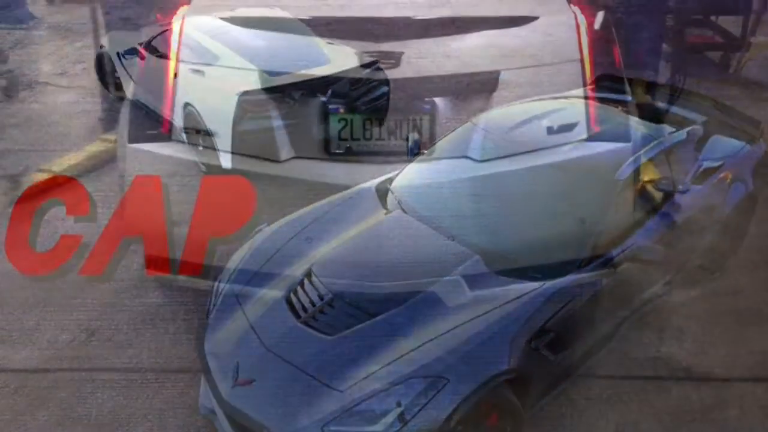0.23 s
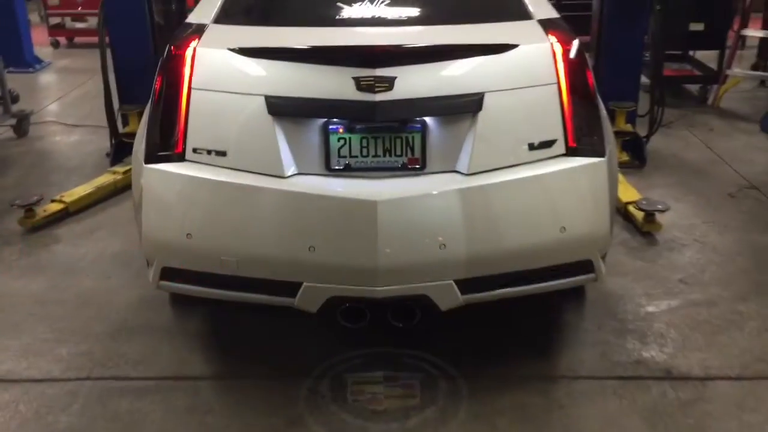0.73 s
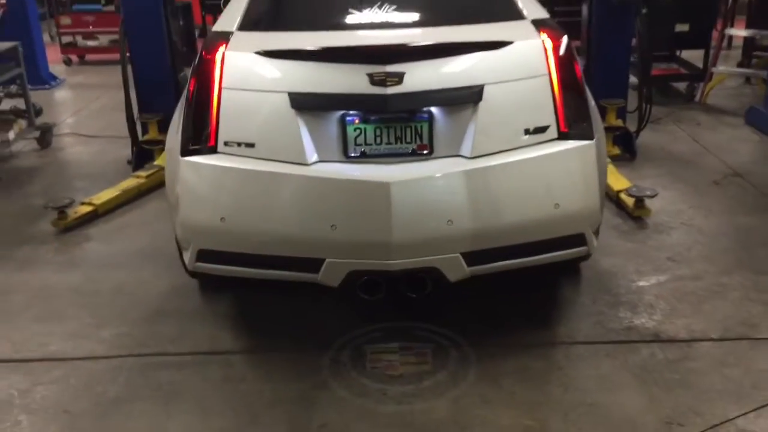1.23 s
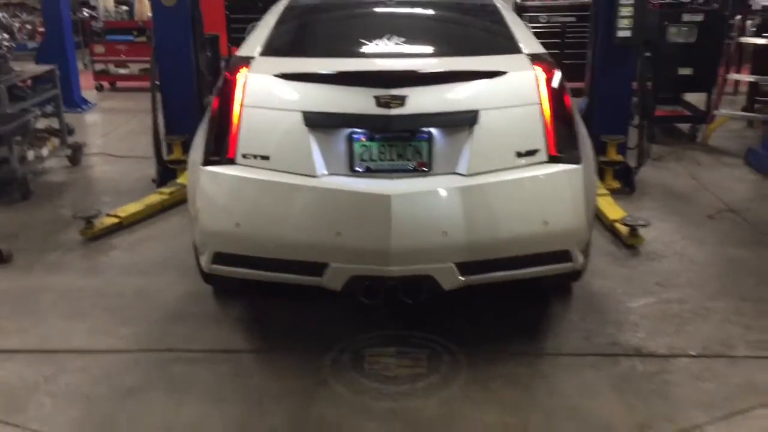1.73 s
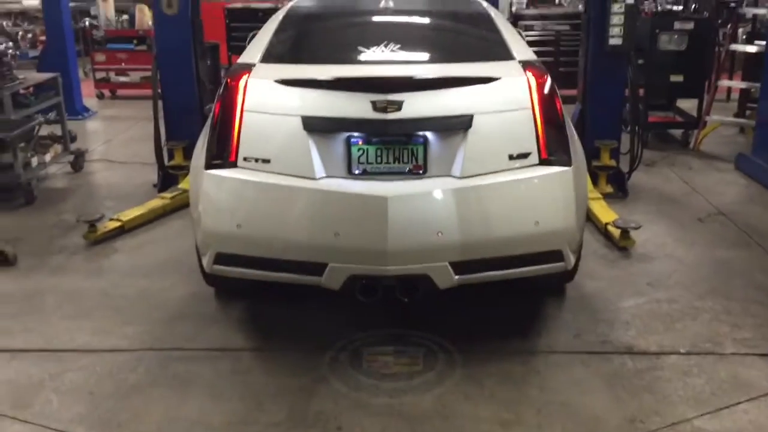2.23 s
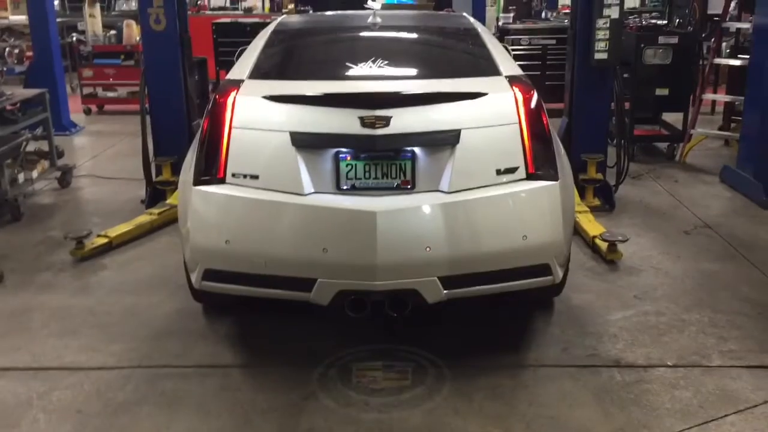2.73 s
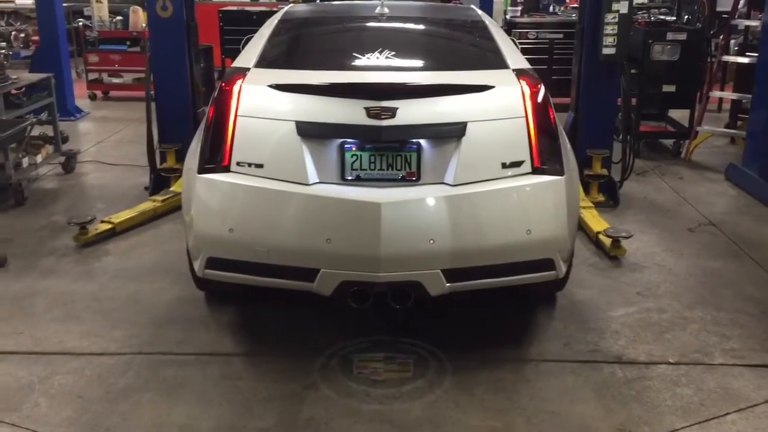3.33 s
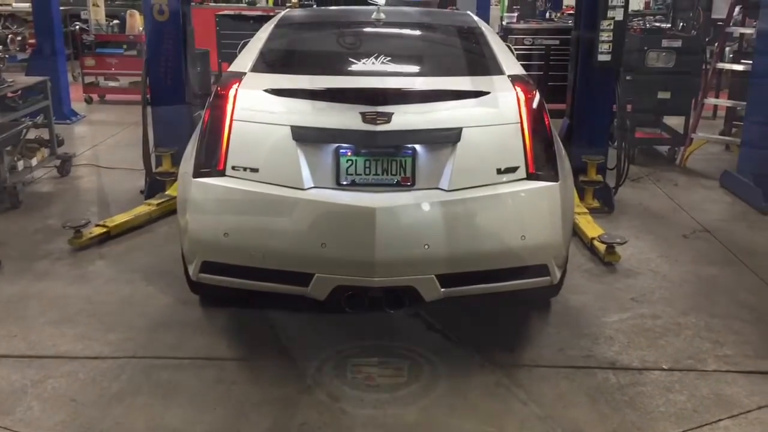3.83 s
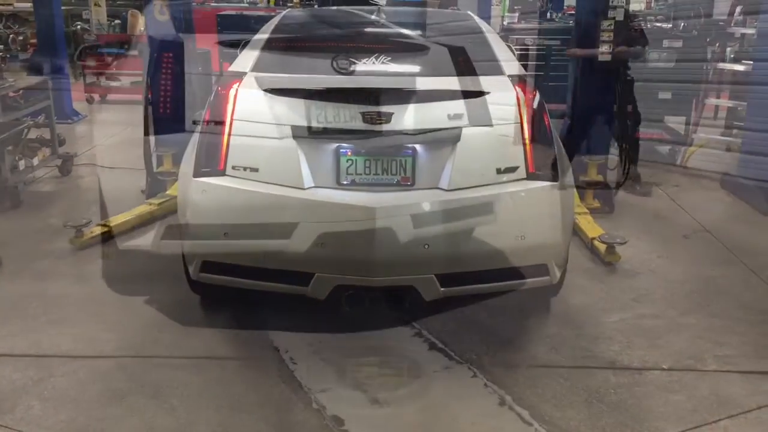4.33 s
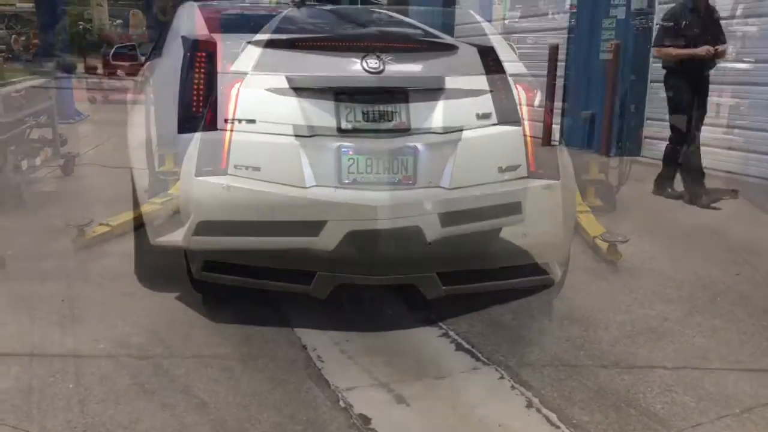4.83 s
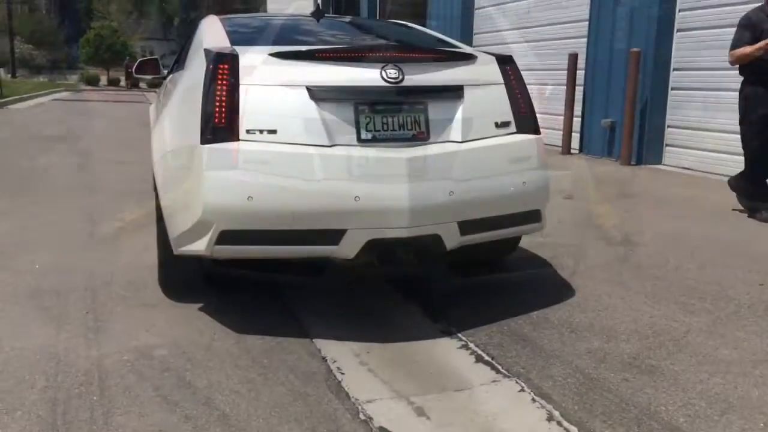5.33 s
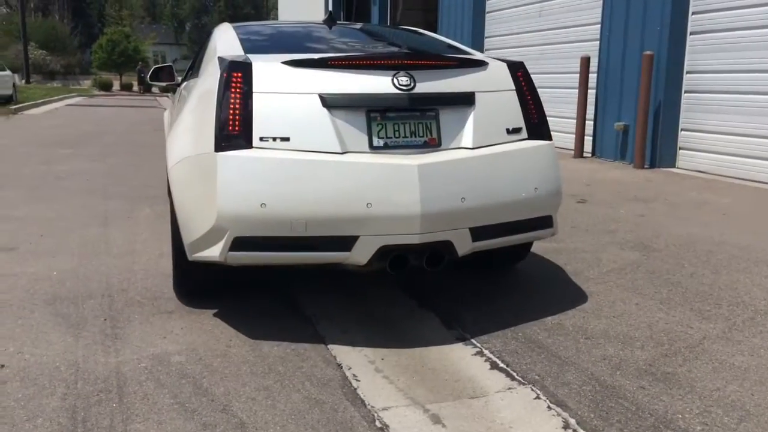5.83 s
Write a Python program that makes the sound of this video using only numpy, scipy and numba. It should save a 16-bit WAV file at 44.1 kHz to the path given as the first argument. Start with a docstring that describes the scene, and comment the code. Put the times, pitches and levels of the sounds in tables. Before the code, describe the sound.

A muscle car's idle throbs and stumbles: low pipe booms, hard slaps and hissy puffs in irregular groups, reverberating indoors. Then the sound dissolves into drier outdoor air, the engine pulls upward under load with a shaky low shudder and brief thin whine, the bass drops away, and spinning tyres roar and screech to the end. Close microphone, same in both channels.

```python
"""Big-cam eight: workshop idle and yard launch

A big-cam eight idles in a workshop, heard close behind the tailpipes. Uneven firings ring the resonant
pipes, and puffs of turbulent gas spit from the tips in groups, a few to the second, and reverberate.
The scene dissolves to a yard: the firing rate climbs under load, the pipes sing and gate the gas, a blower
whines, and the tyres break loose with a roar of broadband noise and a stick-slip squeal."""
import sys
import numpy as np
from scipy import signal
from scipy.fft import rfft, irfft
from scipy.io import wavfile
from scipy.ndimage import uniform_filter1d
from numba import njit

SR = 44100
rng = np.random.default_rng(int(sys.argv[2]) if len(sys.argv) > 2 else 0)


def generate_wav(signal):
    """Clip the signal to [-1, 1] and save it as 16-bit WAV at the path in sys.argv[1]."""
    frames = np.transpose(np.atleast_2d(signal))
    scaled = np.clip(frames, -1, 1) * 32767
    pcm = np.round(scaled).astype(np.int16)
    wavfile.write(sys.argv[1], SR, pcm)


N = 268524
T = np.arange(N) / SR  # time/s

IDLE_HZ = 46.78  # mean firing rate; it wanders
# surges of the idle: start t/s, length/s, then relative levels at the end of the surge:
# gas level/dB, gas swell over the surge/dB, middle pipe level/dB, silencer ring level/dB
IDLE_SURGES = [(0.01, 0.18, -22.5, 4, -42, -25.5), (0.28, 0.18, -19, 9.5, -22.5, -22.5),
               (0.582, 0.02, -35, 0, -38, -28), (0.638, 0.17, -16.5, 4.5, -19, -19),
               (0.917, 0.019, -25, 7, -14.5, -19.5), (0.961, .17, -18.5, 2, -21.5, -17),
               (1.247, 0.14, -16, 6, -17, -18), (1.445, 0.068, -18.5, -1, -27, -18.5),
               (1.579, .18, -16.5, 2, -20.5, -20.5), (1.838, 0.21, -15, 5.5, -17.5, -20),
               (2.168, 0.18, -14, 5.5, -17.5, -18.5), (2.541, 0.17, -15.5, 4.5, -19.5, -18),
               (2.805, .04, -29, -2, -37, -24), (2.879, 0.16, -14.5, 6.5, -21.5, -16),
               (3.184, 0.16, -12.5, 8, -17, -16.5), (3.558, 0.12, -13.5, 5.5, -18, -14.5),
               (3.86, 0.15, -14, 9, -22.5, -21.5), (4.155, 0.14, -15, 8.5, -30, -22.5),
               (4.456, .17, -19, 1.5, -21.5, -28), (4.764, 0.233, -18, 4.5, -30, -26),
               (5.035, .06, -13.5, -3, -20, -19)]


def idle():
    """Source and resonator: a pulse train excites pipe modes, and gas jets echo round the workshop."""
    gas_db, gas_swell_db, middle_db, ring_db = np.transpose(IDLE_SURGES)[2:]
    fire = firings(IDLE_HZ * (1 + 0.06 * walk(3)), jitter=0.1013, scatter_db=4)
    drive = unit(fire) + 0.71 * rng.standard_normal(N)  # turbulence fills in between firings
    pipes = long_pipe(drive) + middle_pipe(drive, middle_db) + silencer(drive, ring_db)
    gas = tailpipe_gas(fire, gas_db, gas_swell_db)
    return ground(pipes + gas + workshop_echo(gas))


def firings(hz, jitter, scatter_db):
    """Pulse train: one impulse per firing, uneven in time (jitter in periods) and size."""
    count = 2000
    chance = rng.standard_normal((count, 2))
    turns = np.cumsum(hz * np.ones(N)) / SR
    at = np.interp(np.arange(count) + jitter * chance[:, 0], turns, np.arange(N))
    inside = at < N - 1
    pulses = np.zeros(N)
    np.add.at(pulses, at[inside].astype(int), undb(scatter_db * chance[inside, 1]))
    return pulses


def surging(level_db, swell_db, attack_s, fall_db_per_s, rest_db):
    """Energy addition: surges attack, swell and decay over a resting level; returns dB."""
    power = undb(2 * rest_db) * np.minimum(0.75 + T / 0.36, 1) ** 2
    swells = np.broadcast_to(swell_db, len(level_db))
    for (start, length), db, swell in zip(np.array(IDLE_SURGES)[:, :2], level_db, swells):
        late = T - start - length
        slope_db = np.where(late < 0, swell * late / length, -fall_db_per_s * late)
        attack = np.clip((T - start) / attack_s, 0, 1)
        power += (attack * undb(db + slope_db)) ** 2
    return 10 * np.log10(power)


# booms of the long pipe: peak t/s, pitch f/Hz, relative level/dB
LONG_PIPE_BOOMS = [(0.14, 80, -33), (0.3, 87, -16.5), (0.41, 88.5, -18), (0.52, 72.5, -13),
                   (0.68, 70, -12.5), (0.79, 73, -13.5), (0.88, 75, -12), (1.0, 75, -13.5), (1.1, 74, -14),
                   (1.27, 77, -9.5), (1.46, 83, -16.5), (1.58, 87, -15), (1.67, 87, -15),
                   (1.84, 86.6, -13.5), (1.96, 85, -13.5), (2.1, 74, -11.5), (2.2, 75.4, -11),
                   (2.32, 67, -16), (2.47, 76, -12.5), (2.57, 80, -8.5), (2.66, 94, -19), (2.82, 83, -12.5),
                   (2.92, 82.4, -12.5), (3.05, 93, -18), (3.219, 82, -7), (3.38, 66, -13.5),
                   (3.52, 78, -16), (3.6, 83, -14), (3.74, 67, -14.5), (3.9, 75, -12), (4.0, 74, -20),
                   (4.14, 81, -31), (4.22, 79, -14), (4.35, 81.6, -12), (4.48, 83, -15), (4.63, 100, -14),
                   (4.76, 101, -16)]
BOOM_RISE_S, BOOM_FALL_S, BOOM_REST_DB = 0.027, 0.043, -24


def booming():
    """Amplitude modulation: bell-shaped swells over a low drone; returns pitch in Hz and gain."""
    power = undb(2 * BOOM_REST_DB)
    for s, _, db in LONG_PIPE_BOOMS:
        span_s = np.where(T < s, BOOM_RISE_S, BOOM_FALL_S)
        power = power + undb(2 * db) * np.exp(-((T - s) / span_s) ** 2)
    throb = undb(1 * walk(30))  # uneven firings beat in the pipe
    return curves(LONG_PIPE_BOOMS)[0], np.sqrt(power) * throb


# longest pipe: f/Hz, bandwidth/Hz, relative level/dB
LONG_PIPE_THUD = [(54.2, 11, 0)]


def long_pipe(drive):
    """Pipe resonance: a mode of moving pitch booms over a fixed low thud."""
    boom_hz, boom_gain = booming()
    boom = boom_gain * even(band(drive, boom_hz, 20.6), 0.035)
    thud_gain = undb(-25) * np.minimum(0.53 + T / 0.9, 1)
    thud = thud_gain * unit(resonate(drive, LONG_PIPE_THUD))
    return (boom + thud) * np.clip((4.85 - T) / 0.29, 0, 1)


# middle pipe: f/Hz, bandwidth/Hz, relative level/dB (level unused)
MIDDLE_PIPE = [(130.55, 11.4, 0)]
# brief drops of the middle pipe: t/s, depth/dB
MIDDLE_PIPE_DROPS = [(0.58, 14), (0.94, 14), (1.09, 18), (1.58, 16), (1.97, 20), (2.17, 7), (2.34, 12),
                     (2.85, 16), (3.22, 13), (3.85, 18)]
DROP_WIDTH_S = 0.025


def middle_pipe(drive, level_db):
    """Pipe resonance: one narrow mode follows the surges slowly and drops out briefly."""
    db = surging(level_db, swell_db=4.5, attack_s=0.073, fall_db_per_s=29.5, rest_db=-30.5)
    db += 2 * walk(22)  # uneven firings beat in the pipe
    for s, depth_db in MIDDLE_PIPE_DROPS:
        db -= depth_db * np.exp(-((T - s) / DROP_WIDTH_S) ** 2)
    hz, width, _ = MIDDLE_PIPE[0]
    return undb(db) * even(band(drive, hz, width), 0.035)


# silencer modes: f/Hz, bandwidth/Hz, relative level/dB
SILENCER_MODES = [(185.5, 4.44, 2), (242.9, 6.24, 2.5), (285.8, 13.1, -4), (341.8, 4.6, -11.5),
                  (361, 6.7, -19), (456, 35, -47.5), (557, 21, -24.5)]


def silencer(drive, level_db):
    """Modal ringing: the drive excites the silencer's resonances, louder in each surge."""
    db = surging(level_db, swell_db=5.5, attack_s=0.03, fall_db_per_s=92, rest_db=-30)
    db += 1.5 * walk(25)  # uneven firings beat in the pipes
    return undb(db) * even(resonate(drive, SILENCER_MODES), 0.063)


# the hardest firings: t/s, relative peak level/dB, throat share level/dB, top end share level/dB
HARD_FIRINGS = [(0.014, -17, -13, -3.5), (0.144, -13, -10, -16), (0.292, -12.5, -24, -8),
                (0.338, -12.5, -23, -4.5), (0.362, -6.5, -13, -16), (0.426, -11.5, -7.5, -11),
                (0.489, -6.5, -10.5, -12), (0.578, -6.5, -15, -14.5), (0.647, -6, -21, -16),
                (0.691, -2, -14, -12.5), (0.717, -4.5, -8.5, -11), (0.776, -8, -3.5, -25),
                (0.837, -8, -20, -12.5), (0.928, -5.5, -14, -14), (0.973, -10.5, -12, -8.5),
                (0.995, -7.5, -10.5, -10), (1.04, -2.5, -6, -14.5), (1.068, -2, -17, -14.5),
                (1.121, -12, -1, -7), (1.254, -10, -10.5, -14), (1.279, -8, -9, -13),
                (1.323, -5, -11.5, -11.5), (1.347, -5.5, -30, -16), (1.384, -6, -14, -11.5),
                (1.47, -7, -9, -27), (1.538, -6, -19, -14.5), (1.58, -11, -17, -12), (1.606, -8, -7, -11),
                (1.65, -6, -9.5, -15), (1.734, -8, -5, -8), (1.842, -13, -16, -8), (1.871, -15, -22, -5),
                (1.89, -18, -22, -14), (1.937, -1.5, -23, -10.5), (1.996, -6, -9.5, -20),
                (2.061, -6.5, -20, -16), (2.173, -29, -18, -14), (2.224, -8, -20, -10),
                (2.264, -10.5, -12, -6.5), (2.304, -11, 0, -17), (2.546, -13, -18, -10),
                (2.575, -3.5, -27, -11), (2.615, -7.5, -11.5, -7), (2.636, -2.5, -9.5, -16),
                (2.698, -9.5, -4, -15), (2.811, -17, -16, -9), (2.876, -21, -3, -30), (2.902, -8, -19, -16),
                (2.927, -6, -17, -13.5), (2.968, -3, -8, -13.5), (3.184, -15, -12, -18),
                (3.209, -12, -9.5, -14), (3.257, -1.5, -16, -13), (3.299, -8.5, -15, -27),
                (3.358, -7.5, -3.5, -8), (3.562, -13.5, -7, -11), (3.607, -7, -19, -25),
                (3.646, -3.5, -9.5, -22), (3.706, -5, -9.5, -9), (3.86, -11.5, -18, -10),
                (3.905, -11.5, -13, -14), (3.928, -11.5, -4.5, -15), (3.971, -6, -9, -20),
                (4.161, -8.5, -18, -9.5), (4.206, -4, -8.5, -15), (4.489, -11.5, -15, -14),
                (4.557, -11, -7, -10)]
# tailpipe and floor colour of the gas: f/Hz, bandwidth/Hz, relative level/dB
TAILPIPE_MODES = [(793, 120, -4.5), (883, 134, 5.5), (966, 45, 5), (1079, 68, 3.5), (1177, 107, -1.5),
                  (1523, 62, -1), (1690, 89, -6.5), (1850, 76, 0), (2202, 83, -6), (2330, 53, -4.5),
                  (2584, 243, -5), (2734, 215, -7), (3502, 235, -4), (3710, 180, -1), (4226, 570, -6.5)]
# jet noise: f/Hz, bandwidth/Hz, relative level/dB
JET_MODES = [(5580, 4400, -0.5), (8900, 1300, 0), (12400, 2200, -6)]
THROAT_TOP_HZ = 1300  # the throat part drives modes below this


def tailpipe_gas(fire, level_db, swell_db):
    """Modulated turbulence: firings gate jet noise, and the tips' modes colour it."""
    gas_db = surging(level_db, swell_db, attack_s=0.0058, fall_db_per_s=285, rest_db=-32.5)
    flow = unit(0.8 + puff(np.sqrt(fire), 0.001, 0.010))
    steady = undb(gas_db - 4) * flow
    throat, middle, top = np.zeros((3, N))
    for s, peak_db, throat_db, top_db in HARD_FIRINGS:
        at = int(s * SR)
        throat[at] = undb(peak_db + throat_db)
        middle[at] = undb(peak_db)
        top[at] = undb(peak_db + top_db)
    noise = rng.standard_normal(N)
    # each hard firing is a slap, then rushing gas
    deep = noise * np.hypot(steady, 1.13 * puff(throat, 0.00048, 0.015)) + 25 * throat
    bright = noise * np.hypot(steady, 0.32 * puff(middle, 0.0007, 0.018)) + 4 * middle
    body = 0
    for k, mode in enumerate(TAILPIPE_MODES):
        source = deep if mode[0] < THROAT_TOP_HZ else bright
        upper_mid = THROAT_TOP_HZ < mode[0] < 2 * THROAT_TOP_HZ
        colour = undb(1.5 - 0.5 * T) if upper_mid else 1  # the upper middle thins out with time
        flicker = undb(2.97 * walk(70))  # the balance of modes keeps changing
        body = body + (-1) ** k * colour * resonate(source * flicker, [mode])
    body = 0.79 * body / np.std(resonate(noise, TAILPIPE_MODES))
    spit = 0
    for mode in JET_MODES:
        spit = spit + resonate(rng.standard_normal(N) * undb(3.45 * walk(60)), [mode])
    spit_gain = np.hypot(undb(1.09 * gas_db - 7) * flow, 1.16 * puff(top, 0.0017, 0.011))
    return body + unit(spit) * spit_gain


def puff(pulses, rise_s, fall_s):
    """Impulse response: each impulse becomes a quick rise and an exponential fall."""
    t = np.arange(int(6 * fall_s * SR)) / SR
    return signal.fftconvolve(pulses, (1 - np.exp(-t / rise_s)) * np.exp(-t / fall_s))[:N]


def workshop_echo(gas):
    """Reverberation: convolution with noise that decays by 60 dB in the reverberation time."""
    t60_s, level_db = 0.48, -9.5
    t = np.arange(int(t60_s * SR)) / SR
    tail = rng.standard_normal(len(t)) * 1000 ** (-t / t60_s) * np.minimum(t / 0.0025, 1)
    tail = signal.lfilter([1], [1, -0.4], tail)  # walls soak up the treble
    tail = tail / np.sqrt(np.sum(tail ** 2))
    return undb(level_db) * signal.fftconvolve(gas, tail)[:N]


BREAK_S = 5.43  # the tyres break loose
# pull in the yard: t/s, firing rate f/Hz, exhaust note level/dB, rasp level/dB, roar level/dB
YARD_PULL = [(3.9, 74.9, -31, -48.5, -35), (4.2, 85.4, -26.5, -27.5, -30), (4.6, 102.7, -18, -21, -41),
             (4.78, 102.3, -16.5, -23, -32), (4.9, 96, -10, -40, -27), (5.04, 88.2, -13.5, -22.5, -36.5),
             (5.1, 92.2, -10.5, -22, -31), (5.15, 108.1, -10, -18, -22.5), (5.21, 123.2, -10.5, -21.5, -17),
             (5.32, 143.5, -11, -21.5, -19.5), (5.39, 155.2, -10.5, -18, -17.5),
             (5.44, 161.1, -13, -18, -12), (5.49, 166, -9.5, -18, -9.5), (5.7, 187.3, -10, -17, -7.5),
             (5.85, 197, -20, -22, -9), (6.09, 200, -36, -28, -7.5)]


def launch():
    """Superposition: exhaust, tyres, blower and a low rumble add in the open yard."""
    fire_hz, note_db, rasp_db, roar_db = curves(YARD_PULL)
    exhaust = open_exhaust(fire_hz, note_db, rasp_db)
    return ground(exhaust) + tyre_roar(roar_db) + tyre_squeal() + blower_whine() + yard_rumble()


# pipes in the open: f/Hz, bandwidth/Hz, relative level/dB
OPEN_PIPE_MODES = [(54.4, 27, 4), (91, 21.3, 13), (257, 39, 2.5), (458, 47, 2.5), (513, 34, -8),
                   (614, 56, -16), (315, 51, -3.5), (147.6, 18, 3.5)]
# gas through the tips in the open: f/Hz, bandwidth/Hz, relative level/dB
OPEN_GAS_MODES = [(279, 18, 21.5), (460, 96, 14), (1130, 360, 6), (1750, 130, 0.5), (2900, 790, -6),
                  (6000, 2500, -5), (9750, 7600, -11)]


def open_exhaust(fire_hz, note_db, rasp_db):
    """Source and resonator: firings sing through pipe modes and gate turbulent gas."""
    fire = firings(fire_hz, jitter=0.045, scatter_db=2)
    drive = unit(fire) + 0.2 * rng.standard_normal(N)
    note = even(resonate(drive, OPEN_PIPE_MODES), 0.07)
    gate = unit(0.25 + puff(fire, 0.001, 0.0026))
    rasp = unit(resonate(gate * rng.standard_normal(N), OPEN_GAS_MODES))
    exhaust = undb(note_db) * note + undb(rasp_db + 2 * walk(25.09)) * rasp
    # the exhaust's bass drops away as the tyres break loose
    cut_hz = np.interp(T, [BREAK_S, BREAK_S + 0.076], [55, 550])
    for _ in range(2):
        exhaust = svf(exhaust, cut_hz, 1.19 * cut_hz)[1]
    return exhaust


# gas and spinning rubber: f/Hz, relative level/dB per Hz
ROAR_SPECTRUM = [(24, -65), (40, -19.5), (207, -15.5), (260, -14.5), (333, -16), (496, -7), (859, -8.5),
                 (1380, -4), (2010, -11.5), (2840, -9), (3560, -12), (10900, -19.5), (15500, -26.5)]


def tyre_roar(level_db):
    """Shaped broadband noise: a fixed spectrum for gas and spinning rubber, with random flicker."""
    f = np.maximum(np.arange(N // 2 + 1) * SR / N, 1)
    hz, db = np.transpose(ROAR_SPECTRUM)
    shape = undb(np.interp(np.log(f), np.log(hz), db))
    roar = unit(irfft(rfft(rng.standard_normal(N)) * shape, N))
    return undb(level_db) * roar * undb(1.5 * walk(150))


# squeal: t/s, slip rate f/Hz (before detuning), relative level/dB
TYRE_SQUEAL = [(5.4, 1395, -34), (5.54, 1402, -22), (5.62, 1394, -23), (5.69, 1470, -13.5),
               (5.78, 1425, -14.5), (5.87, 1407, -15), (5.97, 1400, -16), (6.09, 1354, -32)]


def tyre_squeal():
    """Stick-slip oscillation: tread blocks of both tyres sound an unsteady tone and its octave."""
    slip_hz, squeal_db = curves(TYRE_SQUEAL)
    overtone_db = squeal_db - 9 + 10 * (T - BREAK_S)  # sharpens as the tyres spin up
    squeal = 0
    for detune, db in ((0.99, 0), (0.9, -5)):
        unsteady = 1 + 0.02 * walk(50) + 0.0361 * walk(400)
        phase = 2 * np.pi * np.cumsum(detune * slip_hz * unsteady) / SR
        tone = undb(squeal_db + 2.6 * walk(70)) * np.sin(phase)
        octave = undb(overtone_db + 4.8 * walk(60)) * np.sin(2 * phase)
        squeal = squeal + undb(db) * (tone + octave)
    return squeal * (T > 5.4)


# blower: t/s, f/Hz, level/dB
BLOWER_WHINE = [(4.9, 2910, -50), (5.1, 2966, -36), (5.2, 3060, -32), (5.3, 3220, -25), (5.4, 3230, -28),
                (5.5, 3280, -47)]


def blower_whine():
    """Narrow-band noise: a band-pass of moving centre follows the blower's pitch."""
    hz, db = curves(BLOWER_WHINE)
    return undb(db) * unit(band(rng.standard_normal(N), hz, 230))


# loose low shudder: t/s, level/dB
YARD_SHUDDER = [(4.3, -49), (4.9, -17), (5.2, -29), (5.42, -35), (5.5, -51), (6.09, -55)]


def yard_rumble():
    """Narrow-band noise: low noise round 55 Hz swells and falls as a loose shudder."""
    return undb(curves(YARD_SHUDDER)[0]) * unit(band(rng.standard_normal(N), 55, 40))


def ground(x):
    """Interference: the bounce off the floor cancels much of one band round 670 Hz."""
    return x - 0.81 * svf(x, np.full(N, 670.0), np.full(N, 316.0))[0]


def undb(db):
    """Level law: decibels to amplitude gain."""
    return 10 ** (np.asarray(db) / 20)


def unit(x):
    """Normalisation: scale to rms 1."""
    return x / np.sqrt(np.mean(x ** 2))


def even(x, span_s):
    """Level control: hold the running rms near 1."""
    return x / np.sqrt(uniform_filter1d(x ** 2, int(span_s * SR)) + 1e-9)


def curves(table):
    """Linear interpolation: one sample-rate line for each column after the time."""
    s, *columns = np.transpose(table)
    return [np.interp(T, s, column) for column in columns]


def walk(rate):
    """Random modulation: levels held 1 / rate s and smoothed twice."""
    k = max(int(SR / rate), 1)
    held = np.repeat(rng.standard_normal(N // k + 1), k)
    return 1.3 * uniform_filter1d(uniform_filter1d(held, k), k)[:N]


@njit
def svf(x, hz, width):
    """State-variable filter: band-pass and high-pass outputs with a moving centre."""
    y, b, l = np.empty((2, len(x))), 0., 0.
    for i in range(len(x)):
        g, k = np.tan(np.pi * hz[i] / SR), width[i] / hz[i]
        v = (b + g * (x[i] - l)) / (1 + g * (g + k))
        low = l + g * v
        y[0, i], y[1, i] = k * v, x[i] - k * v - low
        b, l = 2 * v - b, 2 * low - l
    return y


def band(x, hz, width):
    """Cascaded filtering: the band-pass applied twice for steeper skirts."""
    for _ in range(2):
        x = svf(x, hz * np.ones(N), width * np.ones(N))[0]
    return x


def resonate(x, modes):
    """Modal superposition: resonances of alternating sign, which fills in the gaps between them."""
    out = 0
    for k, (hz, width, db) in enumerate(modes):
        a = np.exp(-np.pi * width / SR)  # pole radius
        num = [(1 - a * a) / 2, 0, -(1 - a * a) / 2]
        den = [1, -2 * a * np.cos(2 * np.pi * hz / SR), a * a]
        out = out + (-1) ** k * undb(db) * signal.lfilter(num, den, x)
    return out


def scene():
    """Cross-over: the workshop fades out under the yard, the same in both channels."""
    workshop = idle() * np.clip((5.15 - T) / 0.21, 0, 1)
    yard = launch() * (T > 3.9)
    mix = workshop + yard
    return np.array([mix, mix])


def record(dry):
    """Transducer limits: the microphone loses deep bass, rounds loud peaks and cuts the top."""
    high_pass = signal.butter(2, 40, "high", fs=SR, output="sos")
    low_pass = signal.ellip(12, 0.2, 75, 15650, fs=SR, output="sos")
    mic = signal.sosfilt(high_pass, dry)
    return signal.sosfilt(low_pass, np.tanh(0.91 * mic) / 0.91)


dry = scene()
out = record(dry)
generate_wav(out)
```